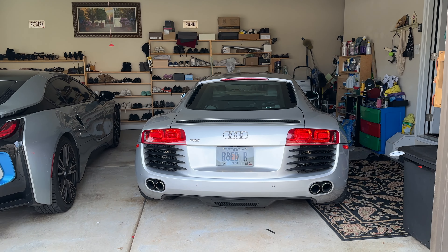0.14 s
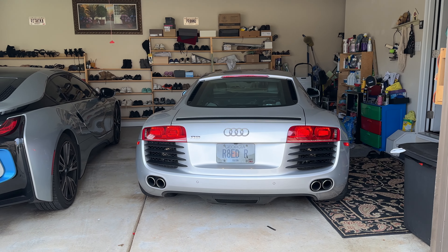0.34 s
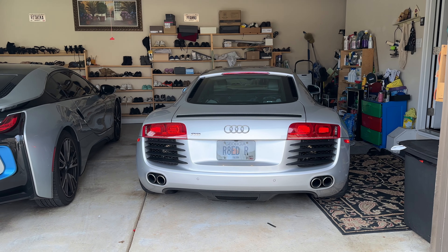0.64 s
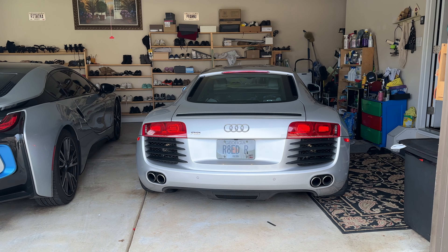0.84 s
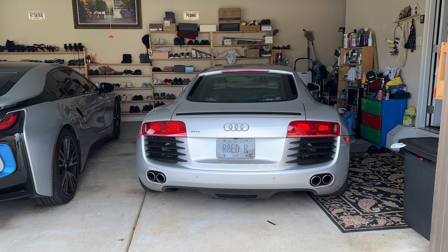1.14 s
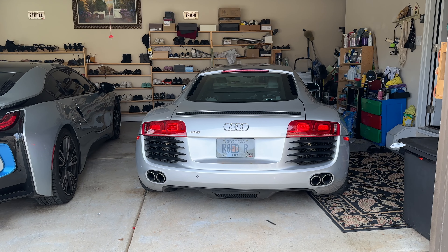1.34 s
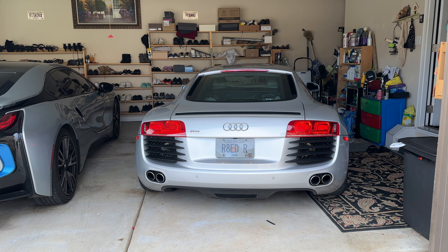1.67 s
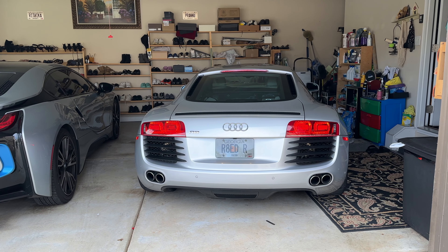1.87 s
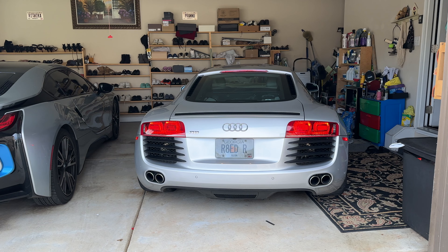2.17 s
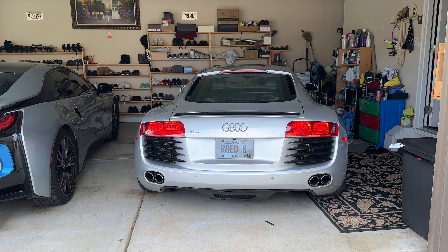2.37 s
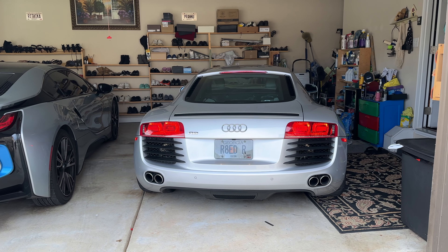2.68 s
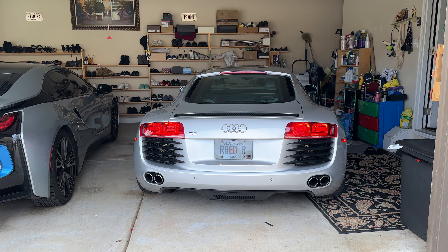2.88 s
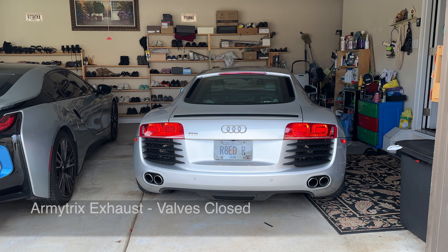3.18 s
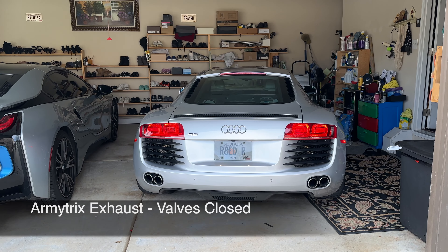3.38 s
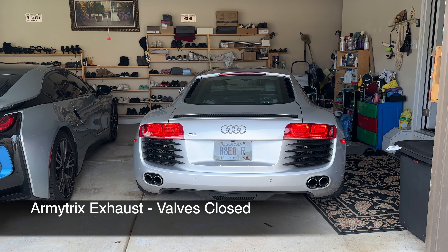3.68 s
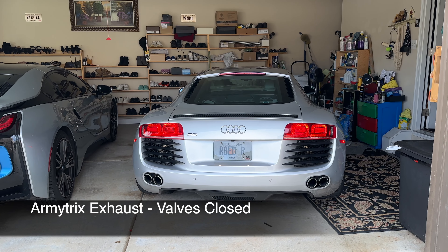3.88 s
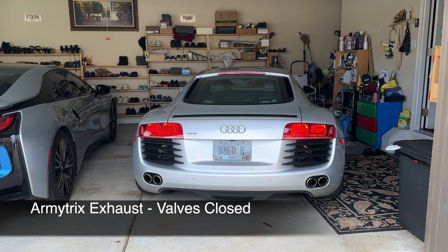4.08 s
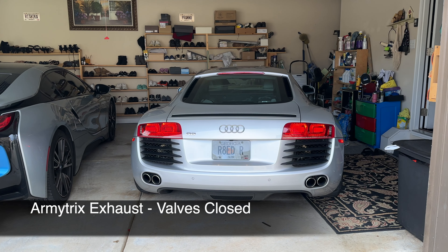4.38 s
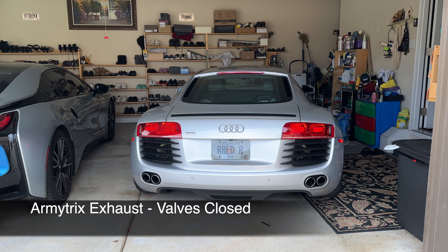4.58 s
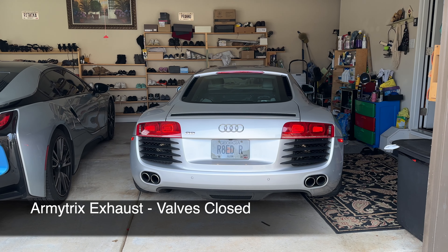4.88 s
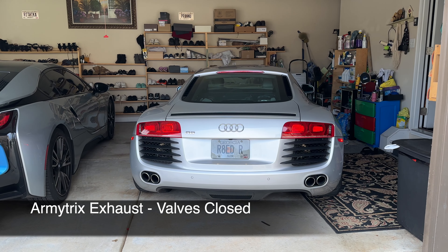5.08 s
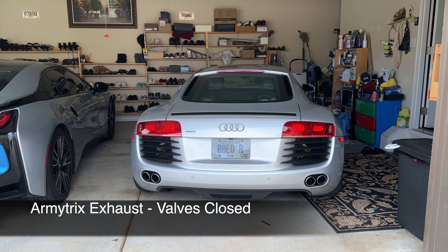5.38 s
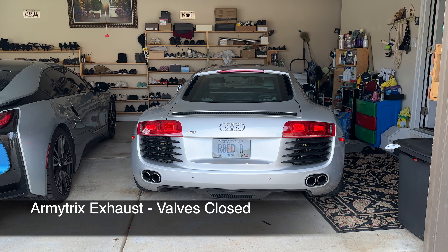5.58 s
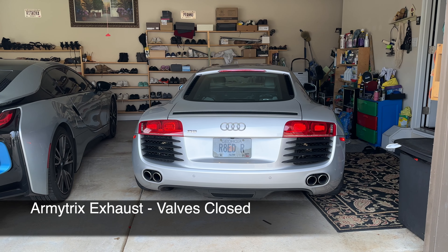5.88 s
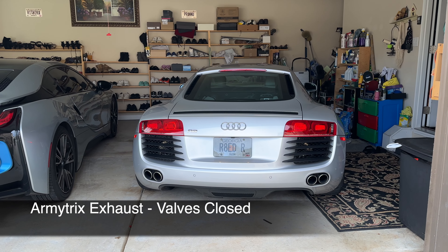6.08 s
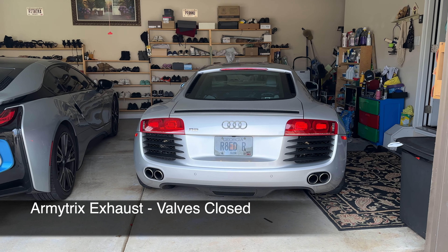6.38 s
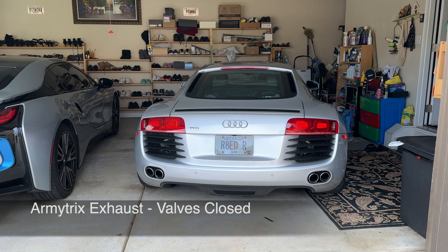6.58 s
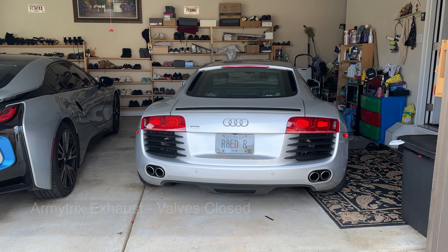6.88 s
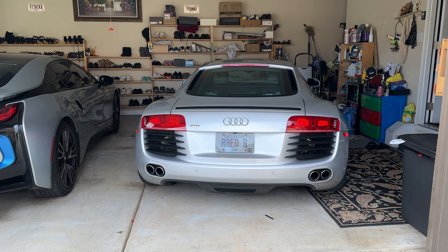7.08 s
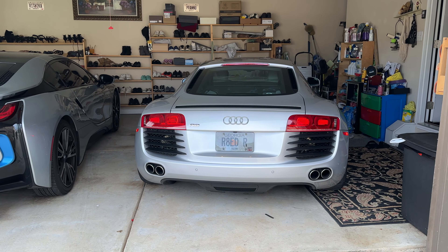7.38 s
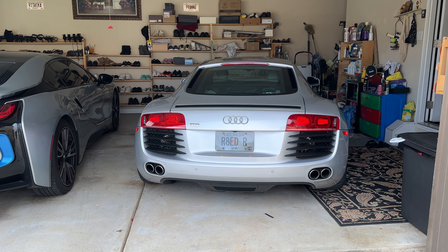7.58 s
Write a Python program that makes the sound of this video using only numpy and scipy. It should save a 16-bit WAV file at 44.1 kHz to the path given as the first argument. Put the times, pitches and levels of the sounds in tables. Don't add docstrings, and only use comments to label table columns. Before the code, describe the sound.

A V8 sports car idles fast and loud in a garage, then its exhaust valves hiss shut and it sinks to a quiet muffled idle.

```python
import sys
import numpy as np
from scipy import signal
from scipy.fft import rfft, irfft
from scipy.io import wavfile
from scipy.ndimage import uniform_filter1d

SR = 44100
rng = np.random.default_rng(int(sys.argv[2]) if len(sys.argv) > 2 else 0)


def generate_wav(sig):
    pcm = np.round(np.clip(np.atleast_2d(sig).T, -1, 1) * 32767).astype(np.int16)
    wavfile.write(sys.argv[1], SR, pcm)


def attenuation_scalar(level_db):
    decades = np.asarray(level_db, float) / 20
    return 10 ** decades


N = 341329
SIZE = 2 ** 14
HZ = np.maximum(np.arange(SIZE // 2 + 1) * SR / SIZE, 1)
T = np.arange(N) / SR
COARSE = 16
COARSE_SR = SR / COARSE


def curve(table):
    s, value = np.transpose(table)
    return np.interp(T, s, value)


def log_interp(hz, table):
    at, value = np.transpose(table)
    return np.interp(np.log(hz), np.log(at), value)


def along(table):
    return log_interp(HZ, table)


def causal(gain_db):
    cepstrum = irfft(np.log(attenuation_scalar(gain_db)), SIZE)
    cepstrum[1:SIZE // 2] *= 2
    cepstrum[SIZE // 2 + 1:] = 0
    return np.exp(rfft(cepstrum))


def colour(x, gain_db):
    response = irfft(causal(gain_db), SIZE)[:SIZE // 2] * np.hanning(SIZE)[SIZE // 2:]
    y = signal.oaconvolve(x, response)[:len(x)]
    return y / np.std(y)


def walk(rate, size=N, sr=SR):
    k = int(sr / rate)
    steps = np.repeat(rng.standard_normal(size // k + 1), k)
    return 1.3 * uniform_filter1d(uniform_filter1d(steps, k), k)[:size]


def garage(x, wet_db, even):
    t60_s = 0.58
    t = T[:SIZE // 2]
    tail = rng.standard_normal(len(t)) * np.exp(-np.log(1000) * t / t60_s) * (t > .004)
    walls = 1 + attenuation_scalar(wet_db) * rfft(tail / np.sqrt(np.sum(tail ** 2)), SIZE)
    walls_db = 20 * np.log10(np.abs(walls))
    return signal.oaconvolve(x, irfft(walls / causal(even * walls_db), SIZE))[:N]


def by_valve(x, share, open_db, shut_db):
    return np.sqrt(share) * colour(x, open_db) + np.sqrt(1 - share) * colour(x, shut_db)


def peaks_db(table):
    return sum(db / (1 + (2 * (HZ - hz) / width) ** 2) for hz, width, db in table)


# t/s, share/0-1
VALVE = [
    (0, 1.),
    (3.42, 1.),
    (4.05, 0.),
    (7.74, 0.),
]


def valve_opening():
    return curve(VALVE)


# t/s, f/Hz
FIRING = [(0, 99.26), (.35, 98.9), (.98, 101.7), (1.3, 100.1), (1.8, 98.6), (2.3, 100.2), (2.4, 102),
          (2.65, 98.6), (3.38, 101.5), (3.77, 98.6), (4.05, 94.96), (4.4, 92.97), (4.6, 88.1), (5.0, 83.76),
          (5.4, 77.2), (6.1, 68.7), (6.8, 57.86), (7.07, 54.54), (7.74, 54.44)]


def firing_rate(share):
    hunt_hz, hunt_rate, governor_s = 1.1, 17, .3
    hunt = walk(hunt_rate)
    return curve(FIRING) + hunt_hz * share * (hunt - uniform_filter1d(hunt, int(governor_s * SR)))


# t/s, level/dB
FLOW = [(0, 0.5), (3.28, -.5), (3.41, -2), (3.5, -6), (3.6, -8.5), (3.85, -14.5), (4.0, -13.5), (4.3, -15),
        (4.6, -19), (5.7, -20.5), (6.6, -22), (7.2, -21.5), (7.4, -20.5), (7.74, -19.5)]


def flow_gain(full_db, slope, waver_db=0):
    return attenuation_scalar(full_db + slope * curve(FLOW) + waver_db)


ORDERS_OPEN_DB = (-13, -26.5, -27.5, -48.5, -50.5, -53.5, -53, -56)
ORDER_WAVER_DB = (0.29, 1.2, 1.33, 3.2, 4.3, 2.9, 1.7, 5.1)
# f/Hz, level/dB
MUFFLER = [(55, -37), (82, -38), (95, -22), (120, -26.5), (142, -36.5), (165, -50.5), (190, -44.5),
           (215, -43.5), (245, -38.5), (280, -44), (310, -55.5), (400, -71), (437, -49), (480, -73),
           (750, -71)]
SHUT_FALL_DB = (0.5, 0, 0.5, 10, 6.5, 12.5, 15, 17)


def order_levels(hz, share):
    levels = []
    for k, (open_db, waver_db) in enumerate(zip(ORDERS_OPEN_DB, ORDER_WAVER_DB)):
        shut_waver_db = 2.5 * min(k / 2, 1) * walk(9, len(hz), COARSE_SR)
        shut_db = log_interp((k + 1) * hz, MUFFLER) + shut_waver_db - SHUT_FALL_DB[k]
        open_power = share ** (1.48 + 0.11 * k) * attenuation_scalar(2 * open_db)
        power = open_power + (1 - share) * attenuation_scalar(2 * shut_db)
        levels.append(10 * np.log10(power) + waver_db * share * walk(4.72, len(hz), COARSE_SR))
    return levels


ORDER_PHASE = ((0, 0), (.06, np.pi), (np.pi, 1.8), (0, 1), (1, 0), (2, 2), (0, 1), (1, 0))


def boom(turns, hz, share):
    turns, hz, share = turns[::COARSE], hz[::COARSE], share[::COARSE]
    wobble = .09
    out = 0
    for k, (db, (opened, shut)) in enumerate(zip(order_levels(hz, share), ORDER_PHASE)):
        phase = share * opened + (1 - share) * shut + k * wobble * walk(25, len(turns), COARSE_SR)
        out = out + np.sqrt(2) * attenuation_scalar(db) * np.cos(2 * np.pi * (k + 1) * turns + phase)
    return signal.resample_poly(out, COARSE, 1)[:N]


# f/Hz, level/dB
PULSE_OPEN = [(25, -37), (38, -23.5), (52, -0.5), (75, -24.5), (112, -2.5), (125, 5.5), (146, -16.5),
              (163, -12.5), (190, -10), (235, -8), (315, -4), (370, -18), (500, -15), (1000, -58.5)]
PULSE_SHUT = [(25, -57), (45, -16), (70, -2.5), (100, 0), (122, 1.5), (155, -12), (185, 1.5), (220, -2.5),
              (255, -5), (285, -4.5), (390, -21.5), (440, -20), (560, -38.5), (1000, -50)]


def burble(turns, share):
    n = np.arange(1, int(turns[-1]))
    at = np.interp(n, turns, np.arange(N)).astype(int)
    pulses = np.bincount(at, rng.standard_normal(2000)[n], N)
    soft_db = 10 * np.log10(1 + (HZ / 1200) ** 6)
    thuds = garage(pulses, wet_db=2.5, even=1.0)
    lumps = by_valve(thuds, share, along(PULSE_OPEN) - soft_db, along(PULSE_SHUT) - soft_db)
    return lumps / np.sqrt(uniform_filter1d(lumps ** 2, SR // 2))


# open pipe level/dB, level against the muffled response/dB
CYCLE_LINES = [(-50, 3.5), (-57, -9), (-52, -6), (-53, -5.5), (-41.5, -11.5), (-30.5, -6.5), (-52, -4.5),
               (-50.5, 1), (-39, -4.5), (-45.5, -3), (-35, -5), (-44, -4.5), (-36, -14.5), (-40.5, -1.5),
               (-42.5, 1.5), (-44.5, -11), (-46.5, 1), (-49.5, -2), (-43, -7.5), (-38.5, -7), (-52.5, -8.5),
               (-52, -3), (-51.5, -8), (-55.5, -1), (-55, -8), (-53.5, -9.5), (-59, -10.5), (-53.5, -6),
               (-54.5, -4.5), (-55.5, -3), (-55, -4), (-64, -5)]
# f/Hz, level/dB
CYCLE_SHUT = [(28, -77), (45, -58.5), (62, -54), (82, -50), (96, -42), (115, -38), (135, -44.5),
              (155, -51.5), (225, -47.5), (250, -48), (280, -50.5), (315, -59.5), (400, -67.5)]


def cycle(turns, hz, share):
    turns, hz, share = turns[::COARSE], hz[::COARSE], share[::COARSE]
    flap_hz, flap_width_hz, flap_db = 222.6, 12, 9.5
    waver_db = share * 1.3 + (1 - share) * 1.5
    wobble = share * .03 + (1 - share) * .015
    eighths = [k for k in range(4, 40) if k % 8]
    out = 0
    for k, (open_db, shut_db) in zip(eighths, CYCLE_LINES):
        line_hz = hz * k / 8
        ring_db = flap_db / (1 + (2 * (line_hz - flap_hz) / flap_width_hz) ** 2)
        half_open = 4 * share * (1 - share)
        open_power = share ** (2 * 0.67) * attenuation_scalar(2 * (open_db + half_open * ring_db))
        shut_power = (1 - share) * attenuation_scalar(2 * (log_interp(line_hz, CYCLE_SHUT) + shut_db))
        size = np.sqrt(2 * (open_power + shut_power))
        slow, quick = (walk(rate, len(hz), COARSE_SR) for rate in (4, 14))
        phase = 2 * np.pi * (turns * k / 8 + rng.random()) + k * wobble * quick
        out = out + size * attenuation_scalar(waver_db * slow) * np.cos(phase)
    return signal.resample_poly(out, COARSE, 1)[:N]


def puffs(turns, depth, start, fade, scatter_db):
    late = turns - start + 1
    size = attenuation_scalar(scatter_db * rng.standard_normal(2000))[late.astype(int)]
    flow = 1 + depth * size * np.exp(-(late % 1) / fade)
    flow = flow / np.sqrt(uniform_filter1d(flow ** 2, SR // 2))
    return garage(flow * rng.standard_normal(N), wet_db=-3.5, even=0.64)


# f/Hz, width/Hz, level/dB
TIPS = [(466, 31, 5), (640, 20, 2), (701, 30, 3), (957, 21, 5), (1010, 48, 1), (1156, 117, 12),
        (1320, 30, 0), (1540, 20, 8), (2030, 23, 2.5), (2320, 29, 8.5), (2398, 59, 6.5), (2591, 61, 10),
        (5570, 95, 8), (6190, 170, 5.5)]
TIPS_SHUT = [(428, 9.8, 6), (467, 33, 7), (724, 45, 2), (750, 13, 4.5), (1150, 30, 9), (1570, 44, -3.5),
             (2180, 24, 8)]


def tips_db():
    return peaks_db(TIPS), peaks_db(TIPS_SHUT)


# f/Hz, level/dB per Hz
RASP_OPEN = [(250, -36.5), (350, 3.5), (434, -15.5), (502, 2.5), (580, -10.5), (716, -4.5), (867, -13.5),
             (959, -3), (1140, -12.5), (1500, -9.5), (1720, -16.5), (2000, -15.5), (3000, -70.5)]
RASP_SHUT = [(250, -48.5), (350, 2.5), (393, -13), (465, -3), (638, -16), (721, -10), (915, -17.5),
             (1130, -14.5), (1240, -18), (1640, -15.5), (1900, -22.5), (2300, -35), (3000, -51.5)]


def rasp(turns, share):
    flow = puffs(turns, 0.25 + 1.1 * share, start=0.017, fade=0.32, scatter_db=3.6)
    dull_db = 10 * np.log10(1 + (HZ / 3000) ** 4)
    open_tips, shut_tips = tips_db()
    return by_valve(flow, share, along(RASP_OPEN) + open_tips - dull_db, along(RASP_SHUT) + shut_tips - dull_db)


# f/Hz, level/dB per Hz
HISS_OPEN = [(1500, -40.5), (1900, -6), (2500, -2.5), (3100, -8), (3900, -4.5), (4900, -13.5), (6200, -11),
             (7600, -8), (9300, -13), (10500, -15), (11200, -21.5), (13000, -25.5), (14500, -22),
             (16000, -30)]
HISS_SHUT = [(1500, -24), (2000, -2.5), (2600, -6), (4000, -11), (6500, -17.5), (7800, -14.5),
             (9300, -15.5), (10000, -15.5), (11000, -20.5), (13000, -31), (16000, -39)]
JET_EDGES_HZ = (1, 3400, 8300, 40000)


def hiss(turns, share):
    open_tips, shut_tips = tips_db()
    opened, shut = along(HISS_OPEN) + open_tips, along(HISS_SHUT) + shut_tips
    out = 0
    for low_hz, high_hz in zip(JET_EDGES_HZ, JET_EDGES_HZ[1:]):
        part_db = -10 * np.log10((1 + (HZ / high_hz) ** 8) * (1 + (low_hz / HZ) ** 8))
        open_part, shut_part = (np.mean(attenuation_scalar(2 * (db + part_db))) / np.mean(attenuation_scalar(2 * db)) for db in (opened, shut))
        flow = puffs(turns, .2 + 1.1 * share, start=.1, fade=.45, scatter_db=3.4)
        jet = by_valve(flow, share, opened + part_db, shut + part_db)
        level = np.sqrt(share * open_part + (1 - share) * shut_part)
        out = out + level * attenuation_scalar(1.3 * walk(11)) * jet
    return out


# f/Hz, level/dB per Hz
RUMBLE = [(18, -17.5), (30, 15), (55, 13), (80, 2), (150, -28)]


def rumble():
    return attenuation_scalar(-62) * colour(rng.standard_normal(N), along(RUMBLE))


# t/s, level/dB, ringing f/Hz
CRACKS = [(0.153, -28, 969), (0.324, -25, 1160), (0.872, -20, 999), (0.923, -25, 961), (0.981, -28, 977),
          (1.03, -25, 1010), (1.109, -26, 1150), (1.429, -26, 958), (1.669, -19, 1170), (1.883, -26, 942),
          (2.391, -25, 1150), (2.632, -26, 1000), (2.724, -26, 1150), (3.193, -22, 1150)]


def cracks():
    fade_s, ring_s, flow_db, ring_db = 0.0041, .009, 24, -12
    gain, rings, t = np.ones(N), np.zeros(N), T[:SIZE // 4]
    for s, db, hz in CRACKS:
        at = slice(int(s * SR), int(s * SR) + len(t))
        gain[at] += attenuation_scalar(db + flow_db) * np.exp(-t / fade_s)
        rings[at] += attenuation_scalar(db + ring_db) * np.exp(-t / ring_s) * np.sin(2 * np.pi * hz * t)
    return gain, rings


# start t/s, level/dB, attack t/s, fade t/s, ringing f/Hz
VENT = [
    (4.0, -66, .05, 0.072, 7660),
    (4.0, -54, .02, .2, 9000),
    (4.0, -73.5, .02, 0.17, 12300),
    (4.2, -61, .05, 0.12, 6780),
    (4.3, -68.5, 0.031, 0.37, 8980),
]
# f/Hz, level/dB per Hz
VENT_COLOUR = [(3500, -26.5), (5500, -6), (7300, -3.5), (9300, -6), (11600, -11), (12500, -13.5),
               (15500, -19)]


def vent(t):
    shut_s, release_s = 5.7, .05
    out = 0
    for s, db, attack, fade, hz in VENT:
        envelope = np.clip((t - s) / attack, 0, 1) * np.exp(-np.abs(t - s) / fade)
        air = attenuation_scalar(db + 2.8 * walk(30, len(t))) * envelope
        ring_db = peaks_db([(hz, 700, 14)])
        out = out + air * colour(rng.standard_normal(len(t)), along(VENT_COLOUR) + ring_db)
    return out * np.exp(-np.maximum(t - shut_s, 0) / release_s)


# t/s, level/dB
TICKS = [
    (4.0097, -42),
    (4.0536, -46.5),
    (4.2182, -55),
    (4.304, -46),
    (4.3789, -53.5),
    (4.6433, -56),
    (4.8318, -63),
    (5.02, -56),
]


def ticks(t):
    knocks = sum(attenuation_scalar(db - 5) * (t >= s) * np.exp(-np.abs(t - s) / .004) for s, db in TICKS)
    return knocks * colour(rng.standard_normal(len(t)), along(VENT_COLOUR))


# start t/s, end t/s, f/Hz, level/dB
WHISTLES = [
    (4.022, 4.249, 12050, -80),
    (4.05, 4.2, 12700, -81),
    (4.529, 4.62, 13300, -86),
    (4.85, 5.2, 13460, -87),
]


def whistles(t):
    out = 0
    for start, end, hz, db in WHISTLES:
        fade = np.sin(np.pi * np.clip((t - start) / (end - start), 0, 1)) ** .5
        tone = np.sin(2 * np.pi * hz * t + 1.5 * walk(60, len(t)))
        out = out + attenuation_scalar(db + 5 * walk(18, len(t))) * fade * tone
    return out


def actuator():
    out = np.zeros(N)
    at = slice(int(3.9 * SR), int(5.4 * SR))
    out[at] = vent(T[at]) + ticks(T[at]) + whistles(T[at])
    return out


def scene():
    share = valve_opening()
    hz = firing_rate(share)
    turns = np.cumsum(hz) / SR
    lumps = flow_gain(-35.5, .82) * burble(turns, share) + cycle(turns, hz, share)
    burst, rings = cracks()
    gas = flow_gain(-36.36, 0.75, .7 * walk(8)) * burst * rasp(turns, share) + rings
    gas = gas + flow_gain(-42.31, 1.035) * hiss(turns, share)
    mono = boom(turns, hz, share) + lumps + gas + rumble() + actuator()
    return np.array([mono, mono])


def band_limit(x):
    return signal.sosfilt(signal.butter(12, 15730, fs=SR, output="sos"), x)


# f/Hz, level/dB
BALANCE_DB = [(60, .8), (100, .9), (112, 1.7), (140, 1.1), (300, 1.6), (400, 1.4), (600, 3), (700, 3.8),
              (850, 1.5), (1100, 3.5), (1450, 1.5), (1700, 0)]
# f/Hz, phase/rad
LEAD = [(100, -.06), (300, .18), (450, 0), (1300, .2), (1700, 0), (6800, 0), (7500, -1.9), (8050, -np.pi),
        (8650, -np.pi), (9300, -1.5), (10500, -.5), (10800, 0), (14800, 0), (15200, 1.3)]
# f/Hz, side level/dB
DIFFUSE = [(100, -63), (220, -21.5), (350, -16.5), (800, -11), (1500, -13.5), (1900, -28.5), (6700, -40),
           (6900, -9), (7900, -16.5), (8300, -18), (8800, -16.5), (10500, -20), (10800, -46),
           (14900, -77.5), (15000, -1.5)]


def record(dry):
    tilt = attenuation_scalar(along(BALANCE_DB) / 2) * np.exp(.5j * along(LEAD))
    t = T[:SIZE // 2]
    smear = rng.standard_normal(len(t)) * np.exp(-t / 0.046)
    side = rfft(smear / np.sqrt(np.sum(smear ** 2)), SIZE) * attenuation_scalar(along(DIFFUSE))
    responses = np.roll(irfft(np.array([tilt + side, 1 / tilt - side]), SIZE), SIZE // 4, axis=1)
    ports = signal.oaconvolve(dry, responses, axes=1)[:, SIZE // 4:SIZE // 4 + N]
    return band_limit(ports)


dry = scene()
out = record(dry)
generate_wav(out)
```